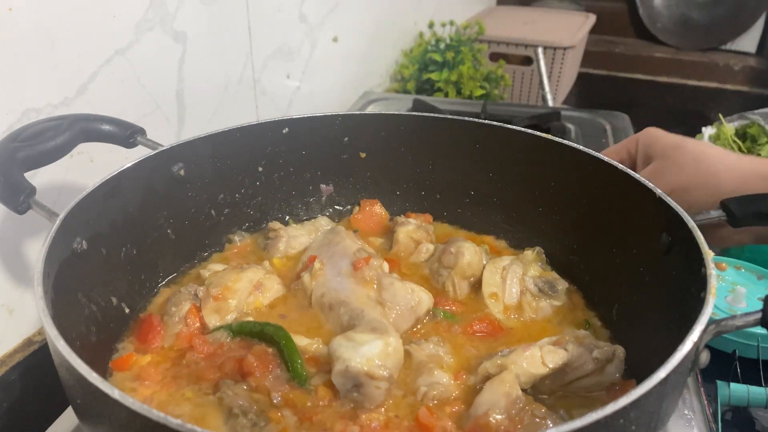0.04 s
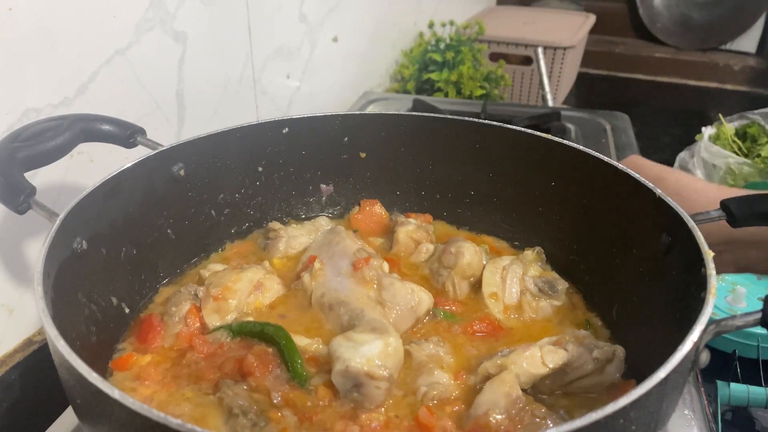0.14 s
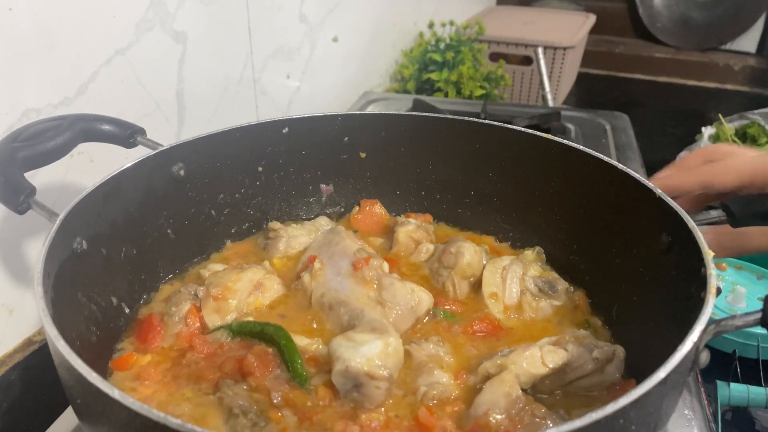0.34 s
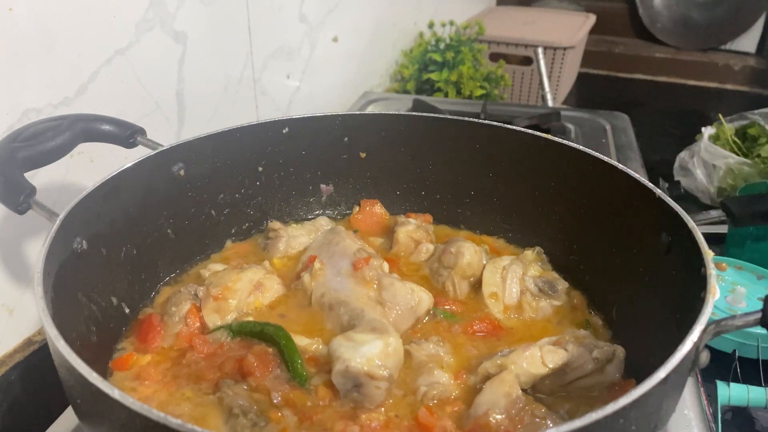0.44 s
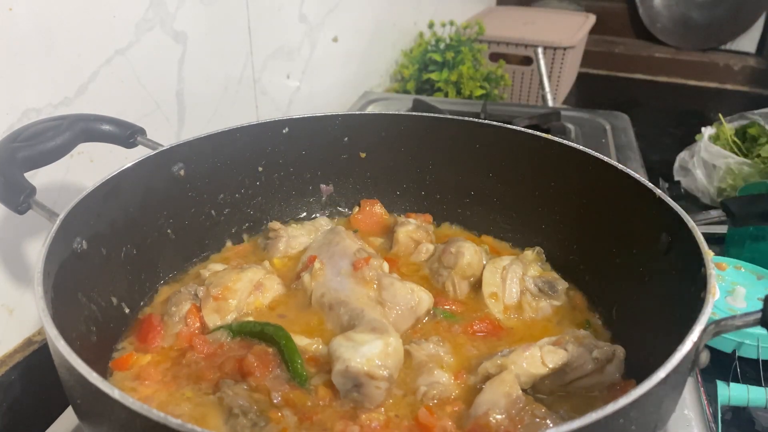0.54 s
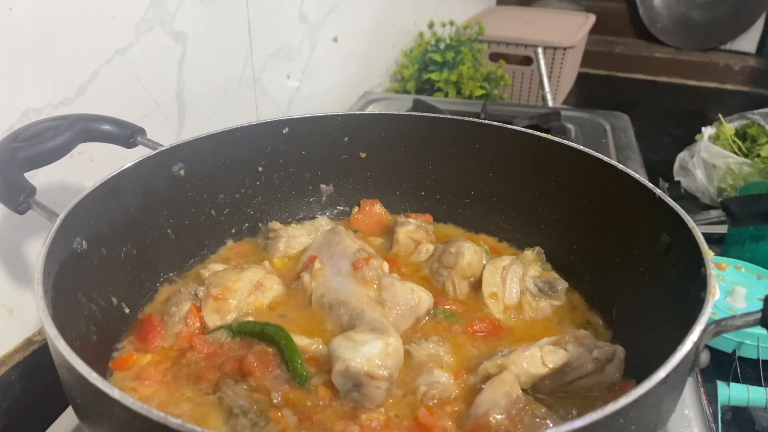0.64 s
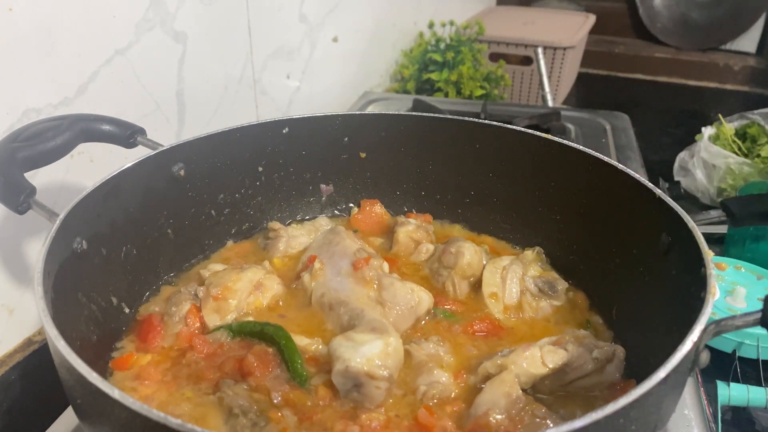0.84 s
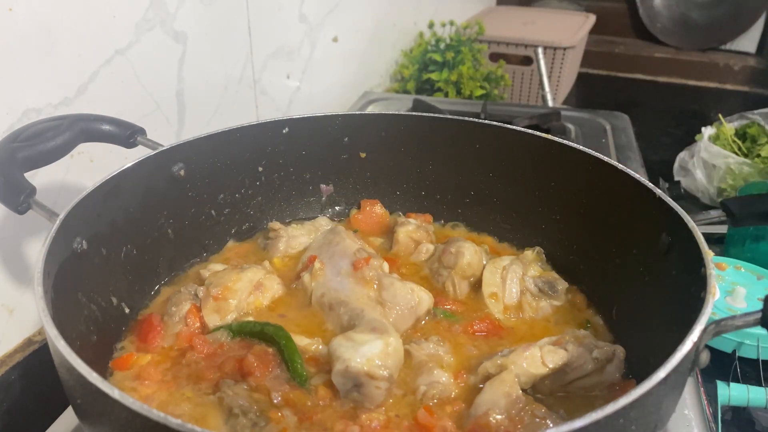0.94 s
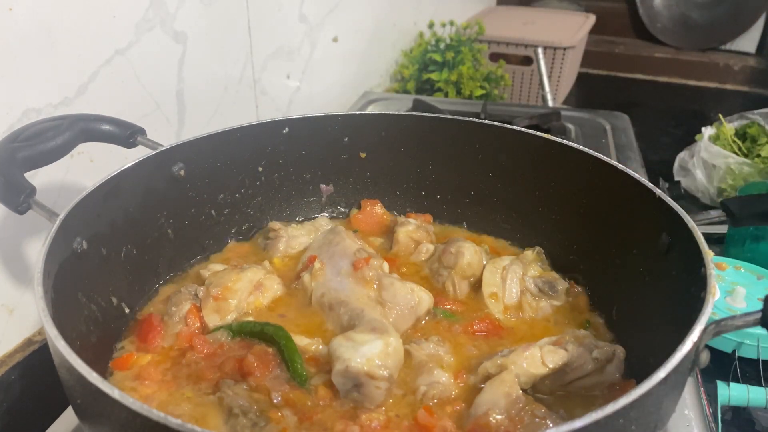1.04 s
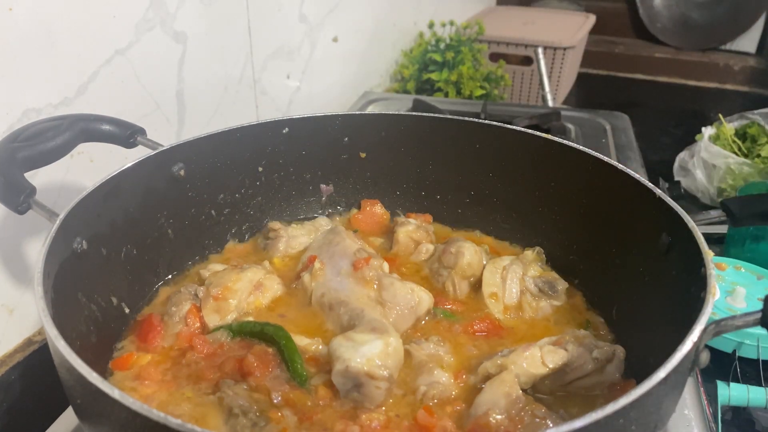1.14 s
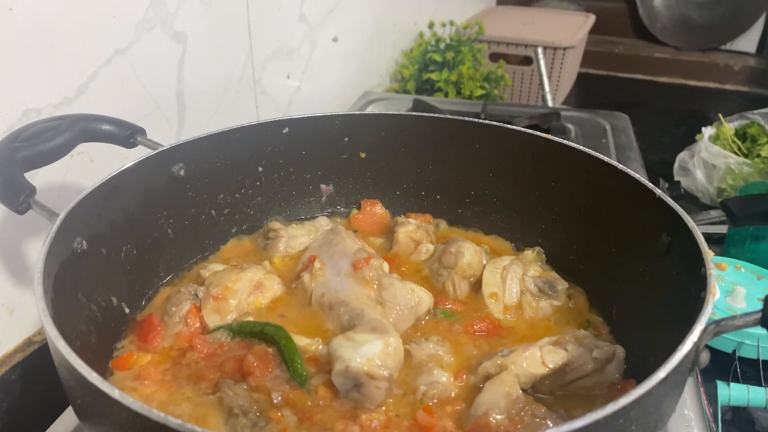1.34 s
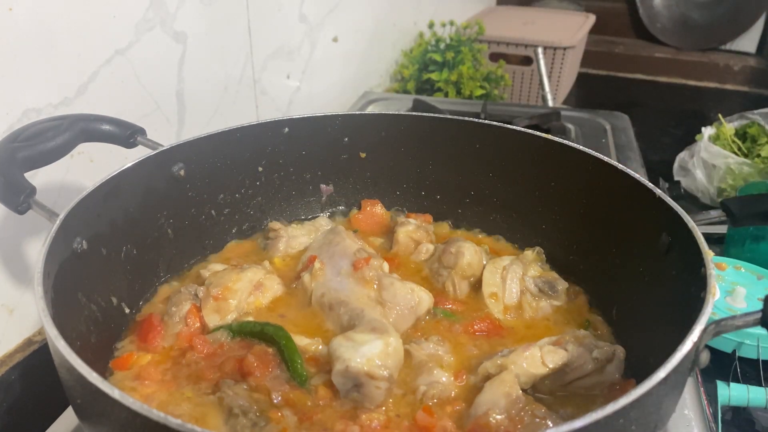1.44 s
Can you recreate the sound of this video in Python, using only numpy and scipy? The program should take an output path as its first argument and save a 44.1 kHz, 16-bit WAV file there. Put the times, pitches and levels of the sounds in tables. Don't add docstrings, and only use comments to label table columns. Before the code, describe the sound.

A steady bubbling sizzle over low gas flame rumble, heard close in stereo; soon the pot is knocked, a utensil clinks, clacks loudly and settles, then only simmering, plops, spits and a faint knock in a small hard room.

```python
import sys
import numpy as np
from scipy import signal
from scipy.fft import rfft, irfft, next_fast_len
from scipy.io import wavfile
from scipy.ndimage import uniform_filter1d

SR = 44100
rng = np.random.default_rng(int(sys.argv[2]) if len(sys.argv) > 2 else 0)


def transcribe(signal):
    frames = np.atleast_2d(signal).T
    limited = np.clip(frames, -1, 1)
    pcm = np.round(limited * 32767).astype(np.int16)
    wavfile.write(sys.argv[1], SR, pcm)


def nominal_scale(level):
    x = np.asarray(level, float) / 20
    return 10 ** x


N = 66150
T = np.arange(N) / SR


def rms_one(x):
    return x / np.sqrt(np.mean(x ** 2) + 1e-20)


def at_hz(points, hz):
    point_hz, point_db = np.transpose(points)
    return np.interp(np.log(hz + 1), np.log(point_hz), point_db)


def coloured(x, spectrum):
    hz = np.fft.rfftfreq(N, 1 / SR)
    audible = hz > .8 * spectrum[0][0]
    return rms_one(irfft(rfft(x) * nominal_scale(at_hz(spectrum, hz)) * audible, N))


def drift(rate_hz):
    pole = np.exp(-80 * np.pi * rate_hz / SR)
    noise = rng.standard_normal(N // 40 + 2002)
    slow = signal.lfilter([1], [1, -2 * pole, pole * pole], noise)[2000:]
    return np.interp(np.arange(N) / 40, np.arange(len(slow)), rms_one(slow))


def patchy(x, patchy_db):
    together = drift(10)
    band_edges = 25 * 2 ** np.arange(0, 9.6, .5)
    spec, hz = rfft(x), np.fft.rfftfreq(N, 1 / SR)
    out = 0
    for low, high in zip(band_edges, band_edges[1:]):
        band = irfft(spec * (hz >= low) * (hz < high), N)
        out = out + band * nominal_scale(patchy_db * (0.43 * together + drift(45)))
    return rms_one(out)


def grains(per_s, spread_db):
    excess_db = spread_db * np.minimum(rng.exponential(1, (2, N)), 5)
    sizes = nominal_scale(excess_db) * rng.choice([-1, 1], (2, N))
    return sizes * (rng.random((2, N)) < per_s / SR)


def flame_rumble():
    # pitch_hz, level_db (dB per Hz)
    spectrum = [(21, -48), (35, -4.5), (163, -4.5), (220, -16.5), (315, -10), (466, -17.5), (519, -7),
                (2170, -14), (2500, -31.5), (3250, -55), (5500, -120)]
    return patchy(coloured(rng.standard_normal((2, N)), spectrum), patchy_db=1.2)


def fat_fizz():
    # pitch_hz, level_db (dB per Hz)
    spectrum = [(1470, -13), (2500, -5.5), (4840, -5), (8270, -10), (9890, 2), (12200, -14.5), (14600, -20),
                (15400, -32), (16000, -47)]
    grain_share = .55
    clicks = rms_one(grains(6000 * nominal_scale(2.6 * drift(51)), spread_db=2.6))
    crackle = grain_share * clicks + (1 - grain_share) * rng.standard_normal((2, N))
    return patchy(coloured(crackle, spectrum), patchy_db=.8)


def ring(clicks, hz, t60_s):
    r, w = nominal_scale(-60 / (t60_s * SR)), 2 * np.pi * hz / SR
    return signal.lfilter([0, np.sin(w)], [1, -2 * r * np.cos(w), r * r], clicks + 1e-18)


def small_bubbles():
    born = grains(120, spread_db=4.0)
    dealt = rng.integers(0, 16, N)
    pitches_hz = np.geomspace(450, 2600, 16)
    return rms_one(sum(ring(born * (dealt == k), hz, 14 / hz) for k, hz in enumerate(pitches_hz)))


def simmer():
    # time_s, level_db
    boil = [(0, -0.2), (.08, 1.5), (.16, 0), (.6, 1.8), (.7, 1.4), (.8, 0.3), (.93, 1.7), (1.08, -0.2),
            (1.2, 1.4), (1.5, 1.55)]
    boil_db = np.interp(T, *np.transpose(boil))
    bed = nominal_scale(-47) * flame_rumble() + nominal_scale(-46) * fat_fizz() + nominal_scale(-57) * small_bubbles()
    return nominal_scale(boil_db) * bed


def pops(rows, cycles, trim_db):
    out = np.zeros(N)
    for start_s, db, hz in rows:
        t = np.maximum(T - start_s, 0)
        swell = 1 - np.exp(-t * hz)
        tone = np.sin(2 * np.pi * hz * t * (1 + 0.0013 * hz * t))
        out += nominal_scale(db + trim_db - 60 * t * hz / cycles) * swell * tone
    return out * [[1], [.6]]


def large_bubbles():
    # start_s, peak_db, pitch_hz
    plops = [
        (0.048, -62, 790),
        (0.099, -28, 733),
        (0.649, -34, 517),
        (0.675, -33, 520),
        (0.748, -28, 1260),
        (0.835, -27, 1800),
        (0.884, -26, 1250),
        (0.905, -22.5, 2120),
        (0.959, -31, 1170),
        (1.14, -26, 1240),
    ]
    return pops(plops, cycles=17, trim_db=-2)


def fat_spits():
    # start_s, peak_db, pitch_hz
    spits = [(0.167, -42, 3680), (0.6852, -21.5, 9830), (0.6913, -24, 4570), (0.7144, -32, 9800),
             (0.7869, -20.5, 9300), (0.846, -24, 10100), (0.861, -27, 9500), (0.9594, -26, 9500),
             (1.1106, -23, 9350), (1.1992, -20.5, 9200), (1.2296, -23, 10000), (1.3743, -28, 10200),
             (1.4505, -29, 4060)]
    return pops(spits, cycles=20, trim_db=1.5)


def blows(rows, modes, rattle, ring_for, slope, ring_db, rattle_db, rise_s, damped_s):
    start_s, db, fade_s = np.transpose(rows)[:, :, None]
    t = np.maximum(T - start_s, 0)
    loudest_db = max(mode_db for hz, mode_db in modes)
    rings = 0
    for hz, mode_db in modes:
        mode_t60_s = fade_s * ring_for * (hz / 1000) ** -slope
        swell = 1 - np.exp(-t / (rise_s + 1 / hz))
        shape = (nominal_scale(db - 60 * t / mode_t60_s) * swell).sum(axis=0)
        wobble = nominal_scale(mode_db - loudest_db + 2.2 * drift(60))
        rings = rings + wobble * shape * np.sin(2 * np.pi * (hz * T + rng.random((2, 1))))
    rings = rings * nominal_scale(ring_db - 495 * np.maximum(T - damped_s, 0))

    noise = coloured(grains(9000, spread_db=2.0), rattle)
    body = irfft(rfft(noise) * (np.fft.rfftfreq(N, 1 / SR) < 11900), N)
    sheen = noise - body

    def envelope(fade_share):
        return (nominal_scale(db - 60 * t / (fade_s * fade_share)) * (1 - np.exp(-t / rise_s))).sum(axis=0)

    rattling = envelope(1) * body + envelope(.3) * sheen
    no_boom = signal.butter(2, 112, "high", fs=SR, output="sos")
    return rings + nominal_scale(rattle_db) * signal.sosfilt(no_boom, rattling)


def pot_thuds():
    # start_s, peak_db, rattle_t60_s
    thuds = [
        (.178, -12.5, 0.26),
        (.2, -19.5, 0.062),
        (.268, -22.5, 0.14),
        (.287, -13, 0.34),
        (.342, -17.5, 0.52),
        (.395, -17, 0.16),
    ]
    # pitch_hz, level_db
    body_modes = [(116, -36), (323, -29), (511, -36), (552, -35), (694, -33), (740, -33), (807, -38),
                  (885, -42), (995, -38)]
    # pitch_hz, level_db
    rim_modes = [(1206, -48), (1480, -45.5), (1857, -33.5), (2180, -44), (2401, -50), (2977, -47.5)]
    # pitch_hz, level_db (dB per Hz)
    rattle = [(47, -47), (80, -20), (231, -31), (320, -27), (720, -3), (1390, -25), (1850, -25),
              (8000, -40.5), (10400, -71), (17600, -120)]
    body = blows(thuds, body_modes, rattle, ring_for=0.64, slope=0.095, ring_db=-4, rattle_db=-8,
                 rise_s=0.0005, damped_s=0.38)
    rim = blows(thuds[:1], rim_modes, rattle, ring_for=1.8, slope=.1, ring_db=-14, rattle_db=-26,
                rise_s=.0015, damped_s=.255)
    return body + rim


def utensil_clinks():
    # start_s, peak_db, rattle_t60_s
    clinks = [
        (.281, -13, .25),
        (.29, -17, .22),
    ]
    # pitch_hz, level_db
    modes = [(1497, -29), (3435, -34), (4764, -36), (6627, -39), (7472, -43), (7870, -43), (8441, -33),
             (8990, -32), (9367, -42), (9636, -38), (9927, -39), (10368, -37), (10966, -41), (11445, -43)]
    # pitch_hz, level_db (dB per Hz)
    rattle = [(120, -36), (200, -3), (322, -9), (1500, -11), (2510, -21), (3490, -17.5), (3830, -20.5),
              (8740, -17), (16000, -21)]
    return blows(clinks, modes, rattle, ring_for=0.9, slope=0.038, ring_db=-10, rattle_db=-9.5,
                 rise_s=0.00061, damped_s=.335)


def utensil_clacks():
    # start_s, peak_db, rattle_t60_s
    clacks = [
        (.3355, -3, .1),
        (.345, -15, .16),
    ]
    # pitch_hz, level_db
    modes = [(1470, -28), (2153, -26), (2713, -27), (4328, -35), (4818, -39), (5453, -38), (5631, -40),
             (6530, -39), (7860, -40), (9179, -39), (9701, -36), (10244, -34)]
    # pitch_hz, level_db (dB per Hz)
    rattle = [(47, -53), (80, -12), (718, -12), (2130, -2), (2330, -12.5), (2720, -17), (10300, -12),
              (14600, -17), (16000, -60)]
    return blows(clacks, modes, rattle, ring_for=1.7, slope=0.082, ring_db=-4, rattle_db=-7.5,
                 rise_s=0.00069, damped_s=0.328)


def utensil_drops():
    # start_s, peak_db, rattle_t60_s
    drops = [
        (.3888, -8, .08),
        (.393, -14, .33),
    ]
    # pitch_hz, level_db
    modes = [(1583, -33), (2056, -32), (3176, -37), (4398, -42), (5227, -40), (6029, -44), (6584, -39),
             (8947, -40), (9189, -41), (9615, -42), (9997, -37), (10180, -38), (10379, -42), (10508, -42)]
    # pitch_hz, level_db (dB per Hz)
    rattle = [(47, -32), (80, -36), (702, -10), (1370, -15.5), (2040, -18.5), (4050, -23.5), (10300, -27.5),
              (15000, -24.5), (16000, -74)]
    return blows(drops, modes, rattle, ring_for=0.8, slope=0.046, ring_db=-9, rattle_db=-3.5,
                 rise_s=0.0018, damped_s=0.7)


def light_knock():
    # start_s, peak_db, rattle_t60_s
    knocks = [
        (1.265, -19, 0.13),
        (1.278, -32.5, 0.74),
    ]
    # pitch_hz, level_db
    modes = [(225, -34), (505, -39.5), (1148, -39), (1287, -57), (1354, -42.5), (1428, -56), (1500, -51),
             (1730, -49)]
    # pitch_hz, level_db (dB per Hz)
    rattle = [(88, -19), (150, -13), (384, -20), (485, -15), (898, -19.5), (1340, -10), (3170, -30),
              (5000, -41), (6500, -60), (11000, -120)]
    return blows(knocks, modes, rattle, ring_for=0.76, slope=.1, ring_db=-6.5, rattle_db=-5.5,
                 rise_s=0.0024, damped_s=1.0)


def kitchen(x):
    t60_s, wall_cut_hz = 0.37, 5500
    size = next_fast_len(N + SR)
    w = 2 * np.pi * np.fft.rfftfreq(size)
    dull = 1 / (1 + 1j * w * SR / (2 * np.pi * wall_cut_hz)) ** 0.19
    out = np.zeros((2, len(w)), complex)
    for k, lag in enumerate(rng.uniform(.008, .03, 16) * SR):
        loop = nominal_scale(-60 * lag / SR / t60_s) * dull * np.exp(-1j * w * lag)
        out[k % 2] += loop / (1 - loop) * (-1) ** (k // 2)
    return irfft(out * rfft(x, size), size)[:, :N]


def ports(pair):
    # pitch_hz, level_db
    opposed = [(60, -17), (130, -16.5), (290, -6.5), (640, -1.5), (1410, 0), (3100, 1), (6820, 1),
               (15000, -4.5)]
    # pitch_hz, difference_db
    lean = [(60, -1.5), (150, -1.0), (380, -2.5), (950, 3.0), (2380, -0.5), (5980, 3.5), (15000, -2.5)]
    hz = np.fft.rfftfreq(N, 1 / SR)
    shared, own = rfft(pair)
    side = np.array([[.5], [-.5]])
    both = shared + nominal_scale(at_hz(opposed, hz)) * own * 2 * side
    dip_db = -42 * np.exp(-((hz - 12100) / 320) ** 2)
    top_cut = np.sqrt(1 + (hz / 15300) ** 60)
    return irfft(both * nominal_scale(dip_db + side * at_hz(lean, hz)) / top_cut, N)


def scene():
    hits = pot_thuds() + utensil_clinks() + utensil_clacks() + utensil_drops() + light_knock()
    room = nominal_scale(-21) * kitchen(hits[0])
    return ports(simmer() + large_bubbles() + fat_spits() + hits + room)


def band_limit(x):
    return signal.sosfilt(signal.butter(12, 16390, fs=SR, output="sos"), x)


def record(dry):
    limit_db, limit_share, release_db_per_s, ceiling = -5, .5, 400, 1.1
    peak_db = 20 * np.log10(np.abs(dry).max(axis=0) + 1e-9)
    over_db = np.maximum(peak_db - limit_db, 0)
    released_db = release_db_per_s * T
    held_db = np.maximum.accumulate(over_db + released_db) - released_db
    gain = nominal_scale(-limit_share * uniform_filter1d(held_db, size=65))
    mix = ceiling * np.tanh(dry * gain / ceiling)
    return band_limit(mix)


dry = scene()
out = record(dry)
transcribe(out)
```